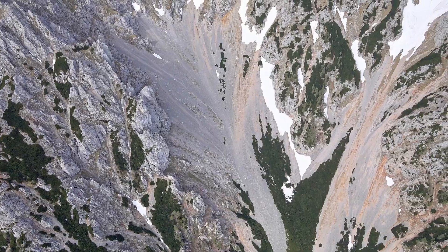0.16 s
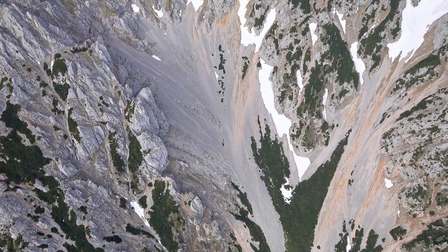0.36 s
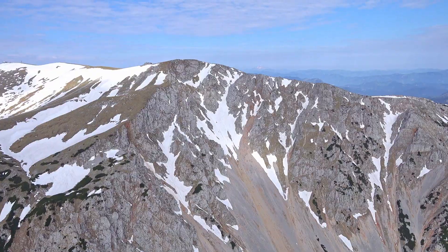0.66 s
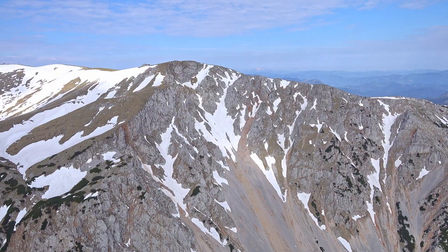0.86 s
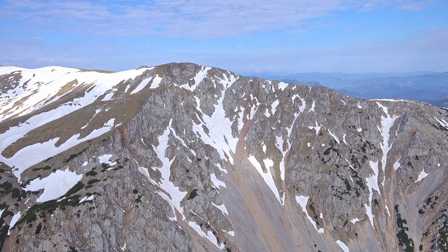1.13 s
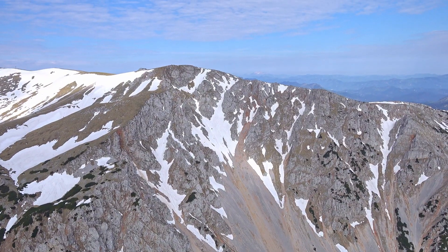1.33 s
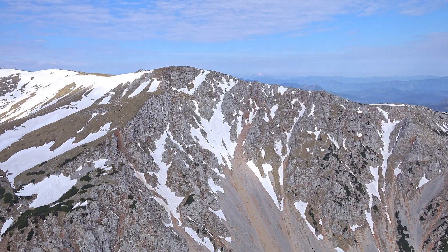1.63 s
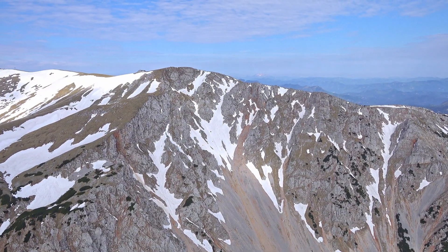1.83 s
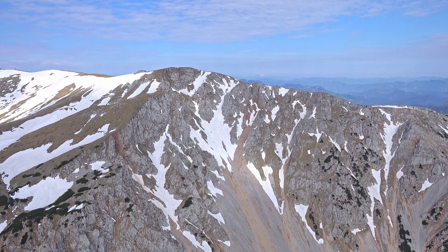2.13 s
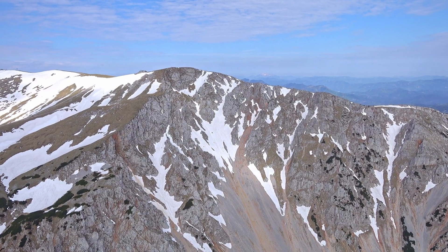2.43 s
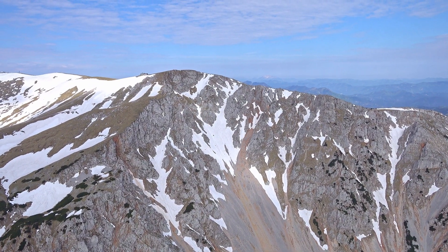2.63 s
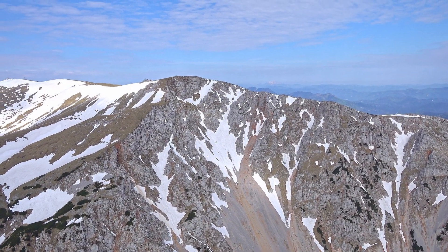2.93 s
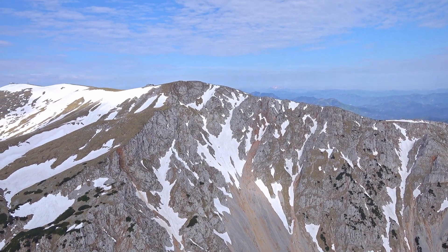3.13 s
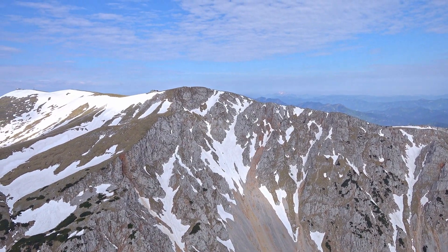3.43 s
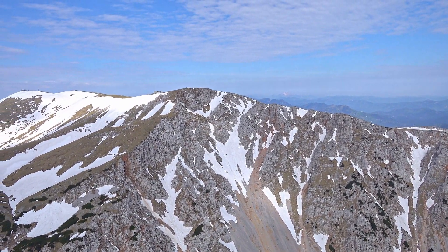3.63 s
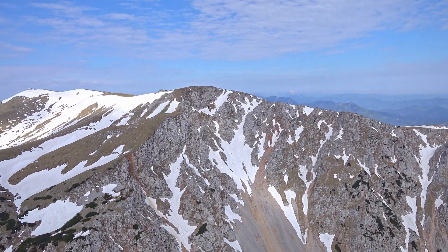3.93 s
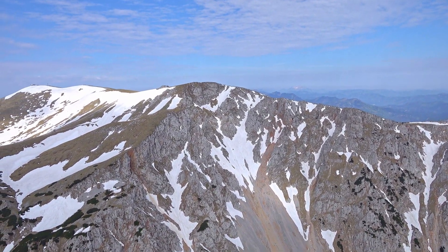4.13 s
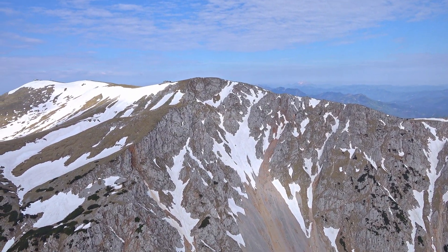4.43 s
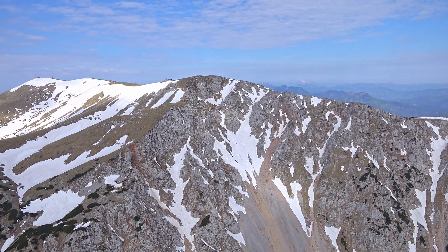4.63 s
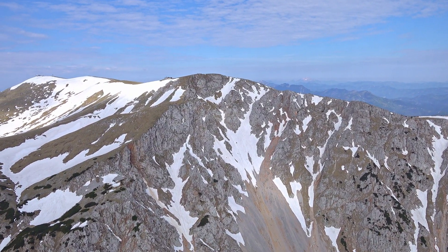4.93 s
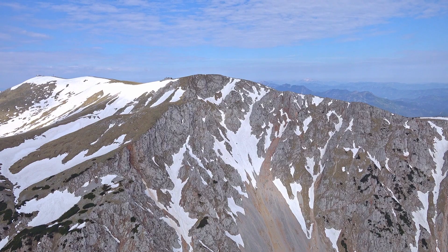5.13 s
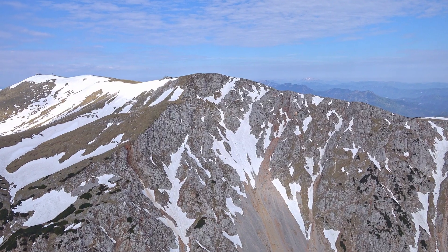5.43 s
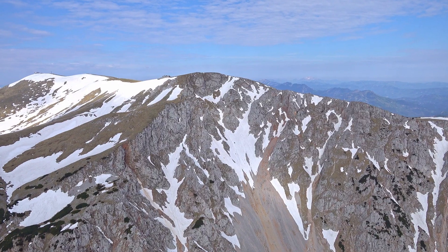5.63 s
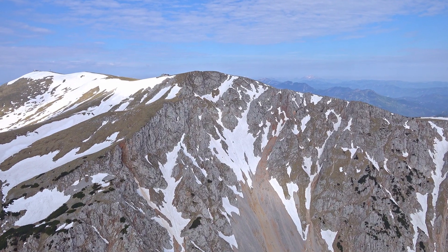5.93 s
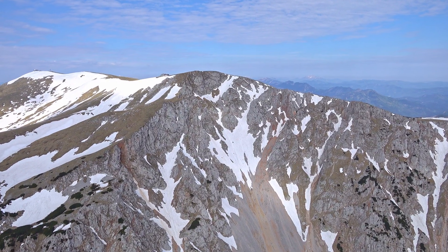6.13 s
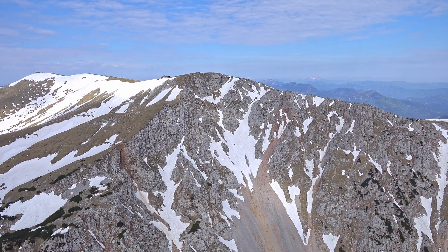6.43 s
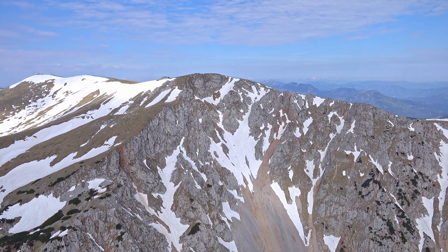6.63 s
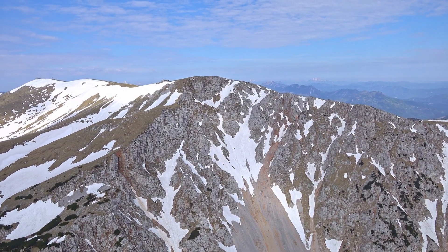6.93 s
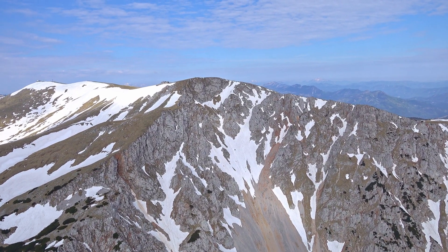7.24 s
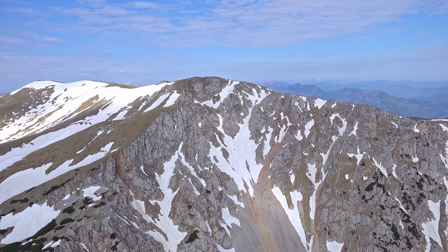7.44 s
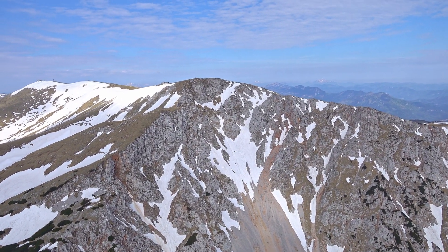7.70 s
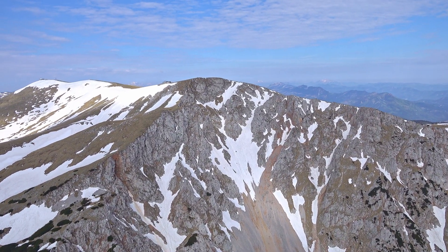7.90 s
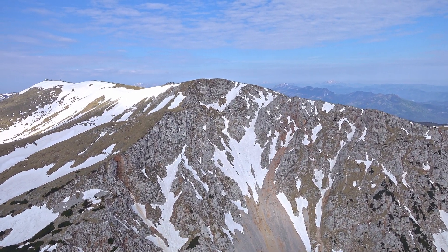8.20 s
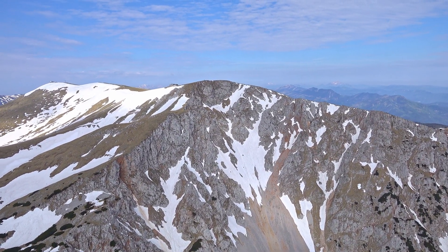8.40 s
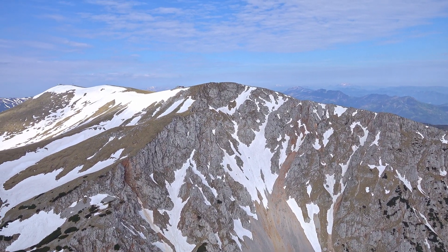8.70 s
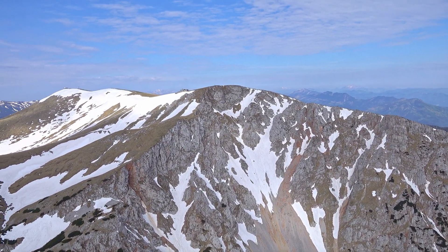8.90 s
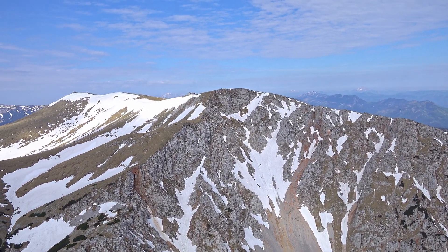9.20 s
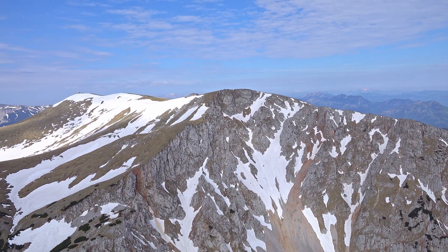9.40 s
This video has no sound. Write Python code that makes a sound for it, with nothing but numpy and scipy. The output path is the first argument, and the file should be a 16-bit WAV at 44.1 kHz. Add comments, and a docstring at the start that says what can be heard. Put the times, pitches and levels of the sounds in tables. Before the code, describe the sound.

Constant deep engine and propeller buzz in an open cockpit, with rushing wind, rough puffs, and fast high rotor swishes about eleven per second.

```python
"""In the open cockpit of a small cruising gyrocopter, a three-blade pusher propeller drones: a harmonic series of tones.
A geared four-cylinder engine adds the tones of its camshaft rate, strongest at the firing rate.
The two-blade rotor swishes overhead: pulses of pressure, bands of noise on moving centres and a tick each turn.
The airstream, octave bands of shaped noise with short rough puffs, buffets a small microphone.
A limiter turns down the loud moments."""
import sys
import numpy as np
from scipy import signal
from scipy.fft import rfft, irfft, next_fast_len
from scipy.io import wavfile
from scipy.ndimage import uniform_filter1d, minimum_filter1d

SR = 44100
rng = np.random.default_rng(int(sys.argv[2]) if len(sys.argv) > 2 else 0)


def to_wav(s):
    """Save 16-bit WAV."""
    ch = np.atleast_2d(s).T  # columns
    pcm = np.round(np.clip(ch, -1, 1) * 32767)  # PCM
    wavfile.write(sys.argv[1], SR, pcm.astype(np.int16))


def level_to_linear(level):
    """Convert decibel levels to linear amplitude factors, elementwise."""
    exponent = np.asarray(level, float) / 20
    return 10 ** exponent


N = 421574  # samples


def walk(rate):
    """Random modulation: levels held for 1 / rate s and slewed twice, with a spread near 0.76."""
    hold = int(SR / rate)
    steps = np.repeat(rng.standard_normal(N // hold + 1), hold)
    return 1.02 * uniform_filter1d(uniform_filter1d(steps, hold), hold)[:N]


def curves(table):
    """Linear interpolation: the columns of a table joined by straight lines in time."""
    s, *columns = np.transpose(table)
    return [np.interp(np.arange(N) / SR, s, column) for column in columns]


def bumps(table):
    """Gaussian modulation: bell-shaped swells in dB, summed; the half length is the bell's deviation."""
    t = np.arange(N) / SR
    return sum(db * np.exp(-.5 * ((t - s) / half) ** 2) for s, half, db in table)


def noise(shape):
    """Spectral shaping: noise of rms 1 whose relative gain at each frequency is shape(Hz)."""
    size = next_fast_len(N)
    hz = np.maximum(np.arange(size // 2 + 1) * SR / size, 1)
    x = irfft(rfft(rng.standard_normal(size)) * shape(hz), size)[:N]
    return x / x.std()


def tone(turns, db, wobble_db):
    """Amplitude and phase modulation: turbulence shakes a sine about its rms level db."""
    level_db = db + wobble_db * (walk(6) + .6 * walk(18))
    phase = 2 * np.pi * turns + 0.18 * wobble_db * walk(9)
    return np.sqrt(2) * level_to_linear(level_db) * np.cos(phase)


# short rough puffs of air on the microphone, and the swell of the airstream with each:
# (time [s], relative level [dB], lift of the airstream before band weighting [dB])
PUFF_EVENTS = [(0.3376, -22, 2), (1.0394, -24, 5), (1.477, -20, 6.5), (1.6402, -23, 1.5), (1.9609, -26, 2),
               (2.596, -21, 2.5), (2.8154, -22, 4), (3.25, -31, 5), (3.3248, -23, 1), (3.8, -27, 1.5),
               (5.3294, -22, 5), (5.9179, -20, 4), (6.195, -30, 2.5), (6.2794, -20, 0.5), (6.42, -30, -1.5),
               (7.3194, -27, 5.5), (7.8101, -28, 1), (8.7954, -21.5, 0.5)]


def puffs():
    """Transient turbulence: bursts of grainy mid noise that decay exponentially in a few hundredths of a second."""
    t = np.arange(N) / SR
    envelope = 0
    for s, db, _ in PUFF_EVENTS:
        decay = np.exp(-np.maximum(t - s, 0) / 0.014)
        rise = np.clip((t - s) / .003, 0, 1)
        envelope = envelope + level_to_linear(db) * decay * rise
    grain = level_to_linear(3.3 * walk(300))
    mids = noise(lambda f: 1 / (1 + (f / 1800) ** 4) * f / (f + 700))
    return envelope * grain * mids * 0.26


# spectrum of the airstream: (frequency [Hz], relative density [dB per Hz])
AIR_SPECTRUM = [(15, -4), (35, -0.5), (100, -1), (165, -2.5), (240, -6.5), (290, -2.5), (370, -8.5),
                (470, -11.5), (750, -13), (1000, -18.5), (1400, -30), (2500, -36), (3600, -40.5),
                (5500, -50), (8000, -54.5), (11000, -60), (15000, -84)]
# slow swell of the airstream, before band weighting: (time [s], level [dB])
GUST_SWELL = [(0.0, -0.5), (0.67, 0.5), (1.0, 1.5), (1.35, -4), (2.2, -5), (2.55, -1), (3.4, -4), (4.0, -2),
              (4.82, 2), (5.5, -2), (6.3, 1), (7.3, 1), (7.75, 2.5), (8.3, 2), (8.9, 4.5), (9.56, 1.5)]
# low buffets that shake the microphone, before band weighting: (middle [s], half length [s], level [dB])
LOW_BUFFETS = [(0.35, 0.2, 4), (2.3, .8, 4), (4.2, 0.11, 4.5), (4.9, .6, 5), (6.35, 0.23, 8.5),
               (7.3, 0.17, 6.5), (7.85, 0.093, 7), (8.22, .12, 9), (8.75, 0.17, 5), (9.45, .3, 4)]


def air(blades, passes):
    """Band-wise modulated flow noise: gusts shake the mids, the propeller chops them, the rotor sweeps the treble."""
    air_db = -17  # rms of the whole airstream
    lift_delay_s, lift_s = 0.011, 0.021
    hz, density_db = np.transpose(AIR_SPECTRUM)
    gust_db = curves(GUST_SWELL)[0] + .9 * walk(9)
    lift_db = bumps([(s + lift_delay_s, lift_s, db) for s, _, db in PUFF_EVENTS])
    rumble_db = bumps(LOW_BUFFETS) - 3.5 + .8 * walk(10)
    eddy_db = 0.64 * walk(14) + 0.37 * walk(50)
    out = 0
    for centre in 16 * 2. ** np.arange(11):
        def shape(f):
            octaves = np.clip(np.log2(f / centre), -1, 1)
            density = level_to_linear(np.interp(np.log(f), np.log(hz), density_db, right=-120))
            return density * np.cos(np.pi / 2 * octaves)
        power = np.sum(shape(np.arange(1, SR / 2)) ** 2)
        # how strongly gusts, puffs and buffets act on this octave
        grip = np.exp(-.5 * (np.log2(centre / 2200) / 2.47) ** 2)
        puffed = np.exp(-.5 * (np.log2(centre / 1400) / 1.2) ** 2)
        low = 0.78 / (1 + (centre / 110) ** 3)
        chop_depth = 0.25 * np.exp(-np.log2(centre / 800) ** 2)
        chop = 1 + chop_depth * np.cos(2 * np.pi * blades)
        sweep_db = 2.8 * min((centre / 10000) ** 2, 1.3) * np.cos(2 * np.pi * (passes - .12))
        swell_db = grip * (0.74 * gust_db + eddy_db) + puffed * lift_db + low * rumble_db
        level_db = swell_db + sweep_db + 0.5 * walk(4)
        out = out + np.sqrt(power) * noise(shape) * chop * level_to_linear(level_db)
    return out * level_to_linear(air_db) / out.std()


# pressure pulse of the blade passes: (rms at the pass rate [dB], rms at its octave [dB])
THUMP_LEVELS = (-35.5, -35)
# how hard the blade tips work, levels before the swish envelope:
# (time [s], whistle centre [Hz], whistle level [dB], hiss level [dB])
TIP_NOISE = [(0.0, 4950, -57, -58.5), (0.6, 4830, -54, -59), (1.0, 4800, -46, -56),
             (1.27, 4400, -50, -67.5), (1.6, 4600, -54, -57.5), (2.0, 4780, -51.5, -64),
             (2.4, 4682, -52, -57), (2.95, 4900, -51.5, -65), (3.6, 4620, -47, -57.5),
             (4.2, 5026, -54, -57), (4.7, 4950, -51, -50), (5.2, 4750, -49, -59.5),
             (6.4, 4830, -49.5, -57.5), (7.0, 4700, -47.5, -54.5), (7.6, 4242, -50.5, -57.5),
             (8.35, 4157, -51, -58), (8.55, 4250, -42.5, -55), (9.35, 4800, -44, -53),
             (9.56, 4770, -50, -61)]
# spells in which the sizzle grows and reaches higher: (middle [s], half length [s], level [dB])
SIZZLE_SPELLS = [(7.68, .28, 10), (9.0, .26, 8.5), (8.2, .5, 2.5)]
# deviation from pass to pass: (whistle centre [Hz], whistle [dB], hiss [dB], sizzle [dB])
SCATTER = (190, 1, 2.2, 1.1)
# swish of a passing blade, one row each for whistle, hiss and sizzle:
# (bandwidth [Hz], delay [passes], length [passes], floor between passes [share of the bell])
SWISH_BANDS = [(805, -0.044, 0.091, .22), (2600, 0.11, 0.1, .16), (6500, .15, .13, .12)]


def rotor(passes):
    """Periodic blade-passage noise: each pass whistles, then hisses; one blade adds a tick, and the pressure pulses."""
    hiss_hz, sizzle_top_hz = 8230, 12800
    tick_hz, tick_db = 8260, -53.5  # means; peak level
    out = sum(tone(k * passes, db, wobble_db=1.1) for k, db in enumerate(THUMP_LEVELS, 1))
    whistle_hz, whistle_db, hiss_db = curves(TIP_NOISE)
    # -67 dB at a hiss of -57 dB, following 0.6 of the hiss changes
    sizzle_db = -67 + .6 * (hiss_db + 57) + bumps(SIZZLE_SPELLS)
    chance = rng.standard_normal((int(passes[-1]) + 2, 4)) * SCATTER
    # the louder the sizzle, the higher it reaches
    sizzle_hz = sizzle_top_hz + 260 * (sizzle_db - sizzle_db.max())
    pass_whistle_hz = whistle_hz + chance[np.round(passes).astype(int), 0]
    centres = pass_whistle_hz, np.full(N, hiss_hz), sizzle_hz
    layers = zip((whistle_db, hiss_db, sizzle_db), chance.T[1:], centres, SWISH_BANDS)
    for level_db, scatter_db, hz, (width, delay, length, steady) in layers:
        nearest = np.clip(np.round(passes - delay).astype(int), 0, len(chance) - 1)
        bell = np.exp(-.5 * ((passes - delay - nearest) / length) ** 2)
        flutter = level_to_linear(1.4 * walk(70) + 1.4 * walk(40))  # the tip vortex flutters
        envelope = (steady + bell) * flutter
        # low noise lifted onto a moving centre
        carrier = np.exp(2j * np.pi * np.cumsum(hz) / SR)
        a, b = (noise(lambda f: 1 / (1 + (2 * f / width) ** 4)) for _ in range(2))
        band = a * carrier.real + b * carrier.imag
        out = out + level_to_linear(level_db + scatter_db[nearest]) * envelope * band
    # one tick per turn of two passes, its size and pitch drawn anew each turn
    turn = np.floor(passes / 2).astype(int)
    size, pitch = rng.standard_normal((turn.max() + 1, 2))[turn].T
    bell = np.exp(-.5 * ((passes - 2 * turn - 1.09) / 0.037) ** 2)
    ring = np.sin(2 * np.pi * np.cumsum(tick_hz * (1 + .012 * pitch)) / SR)
    return out + level_to_linear(tick_db + 3.2 * size) * bell * ring


# unequal cylinders and valve gear: (multiple of camshaft rate, rms level [dB])
ENGINE_TONES = [(7, -38), (8, -32.5), (11, -47), (12, -63), (13, -39.5), (16, -42), (17, -58.5), (18, -60),
                (23, -64), (24, -55), (26, -45.5), (28, -52.5), (30, -56.5), (34, -60.5), (36, -55.5),
                (37, -57.5), (40, -62), (44, -57), (46, -63.5), (48, -64), (51, -63), (53, -65.5)]


def engine(blades, load_db):
    """Four-stroke periodicity: four firings per camshaft turn, with weaker tones at other multiples of its rate."""
    cam = blades * 2.43 / 6  # gearbox 2.43, two crank turns a cycle, three blades
    firing = tone(4 * cam, -28 + load_db, wobble_db=1.0)
    rest = sum(tone(k * cam + rng.random(), db, wobble_db=2.5) for k, db in ENGINE_TONES)
    return firing + rest


# 1st to 8th blade tone: (rms level at zero inflow, load and waver [dB], slope [dB per unit of inflow],
# share of load [dB per dB], share of waver [dB per dB])
LOWER_BLADE_TONES = [(-19, -0.2, .1, 1.03), (-24.5, 7, .05, .3), (-20.5, -4.5, 0.48, 0.17),
                     (-35.5, 9.5, .6, 0.56), (-37.5, 6, 1.22, 0.7), (-32.5, 5.5, 0.52, 0),
                     (-41, -7.5, .1, 2.5), (-31.5, .5, 0.78, 0.25)]
# steady upper blade tones: (multiple of blade rate, rms level [dB])
UPPER_BLADE_TONES = [(9, -56.5), (10, -45), (11, -53.5), (12, -57), (13, -51), (14, -60), (15, -58),
                     (16, -58), (17, -61.5), (18, -61), (20, -65.5)]


def propeller(blades, inflow, load_db, waver_db):
    """Harmonics of the blade rate: one pressure peak per blade, its higher tones smeared out behind it."""
    levels = list(UPPER_BLADE_TONES)
    for k, (db, slope_db, share, sway) in enumerate(LOWER_BLADE_TONES, 1):
        levels.append((k, db + slope_db * inflow + share * load_db + sway * waver_db))
    out = 0
    for k, db in levels:
        smear = 0.02593 * k ** 2  # turns
        out = out + tone(k * blades - smear, db, wobble_db=1.26 + 0.044 * k)
    return out


# inflow shifts the weight between the blade tones; load also lifts the engine firing; waver acts most on tones 1 and 7:
# (time [s], blade rate [Hz], inflow [signed, about -1 to 1], load [dB], waver [dB])
PROPELLER_STATE = [(0.0, 95.6, .8, 1, -0.5), (0.4, 95.5, -0.45, 0.5, -2.5), (0.8, 94.96, -.3, -1.5, 2),
                   (1.2, 95.1, -0.47, -4, 1), (1.6, 94.52, -0.58, -6, 1), (2.0, 95.25, -0.66, -8, 0),
                   (2.4, 94.85, -0.31, -2, 1), (2.8, 95.46, -0.14, 1.5, -2.5), (3.2, 95.62, 0.81, -4, -3),
                   (3.6, 95.5, 0.35, 0, -2), (4.0, 95.97, 0.46, 0.5, -4), (4.4, 95.93, -0.071, 3.5, 0),
                   (4.8, 95.25, -0.28, -0.5, 3), (5.3, 95.62, -0.59, -3.5, -1.5),
                   (5.6, 96.4, -.9, -1.5, -2.5), (6.0, 97.44, -1.06, -3, 0.5), (6.4, 97.73, -0.18, 3.5, -4),
                   (6.8, 97.9, 0.97, -1, 2.5), (7.2, 97.8, 0.7, 3, 3), (7.6, 98.6, 0.67, 3.5, 2),
                   (8.0, 97.23, 0, 4.5, -2), (8.4, 97.2, -0.066, 7, -3), (8.8, 96.02, -0.54, 4, 1.5),
                   (9.2, 96.23, -.1, 4, 0.5), (9.56, 96.35, 0.38, 1.5, -4.5)]
# the rotor's clock: (time [s], blade passes so far [count])
ROTOR_CLOCK = [(-0.043, 0), (1.09, 13), (1.707, 20), (2.05, 24), (2.4, 28), (4.217, 49), (5.583, 65),
               (7.209, 84), (9.641, 112)]


def scene():
    """Superposition: the pressures of all sources add at one microphone in the open air."""
    blade_hz, inflow, load_db, waver_db = curves(PROPELLER_STATE)
    blades = np.cumsum(blade_hz) / SR
    passes, = curves(ROTOR_CLOCK)
    wind = puffs() + air(blades, passes)
    machine = engine(blades, load_db) + propeller(blades, inflow, load_db, waver_db)
    return (wind + rotor(passes) + machine)[None]


def low_pass(x):
    """Removes everything above the highest recorded frequency."""
    return signal.sosfilt(signal.butter(12, 15640, fs=SR, output="sos"), x)


def record(dry):
    """Peak limiting: the peaks within about 11 ms either side set the gain; the ends fade over 4 ms."""
    peaks = uniform_filter1d(-minimum_filter1d(-np.abs(dry), size=500), size=500)
    gain = level_to_linear(3.0) / (1 + (peaks / 0.41) ** 2) ** 0.4
    to_end = np.minimum(np.arange(N), np.arange(N)[::-1])
    mix = dry * gain * np.minimum(to_end / (.004 * SR), 1)
    return low_pass(mix)


dry = scene()
out = record(dry)
to_wav(out)
```